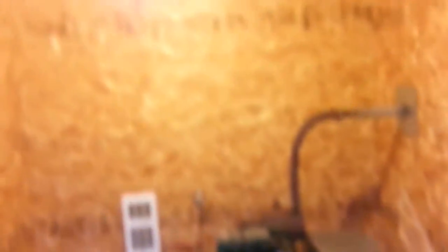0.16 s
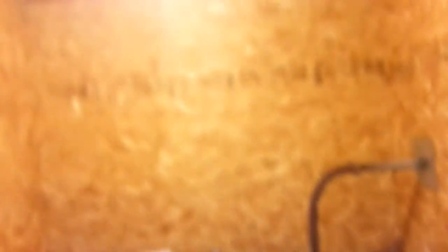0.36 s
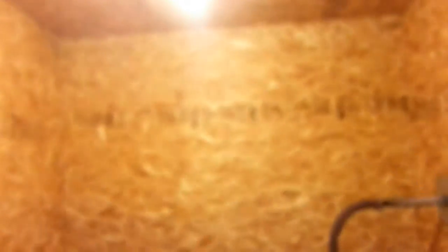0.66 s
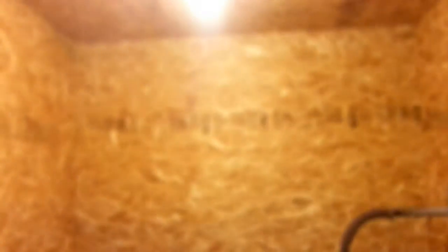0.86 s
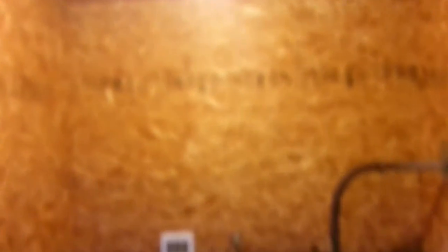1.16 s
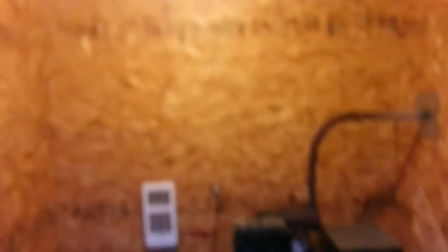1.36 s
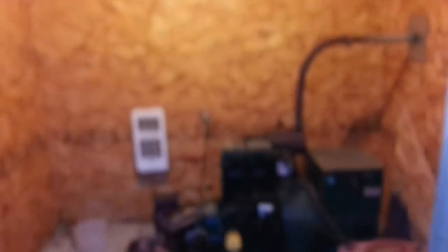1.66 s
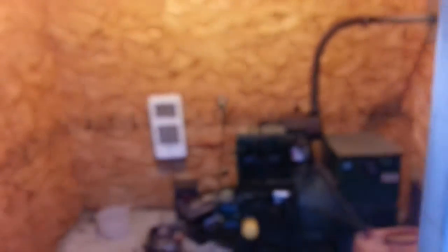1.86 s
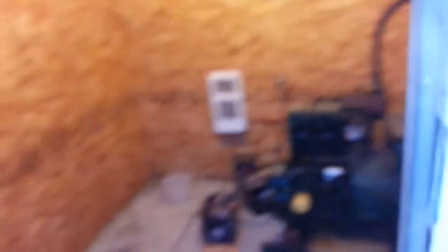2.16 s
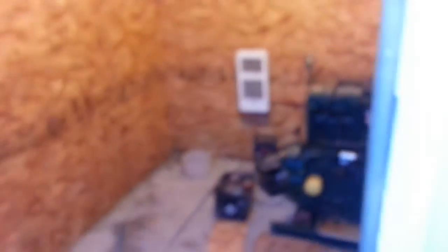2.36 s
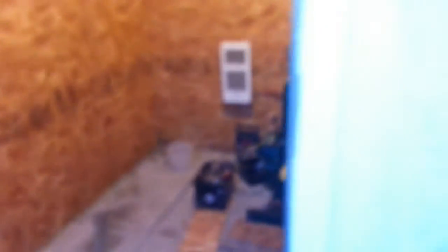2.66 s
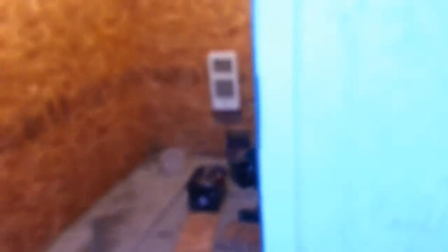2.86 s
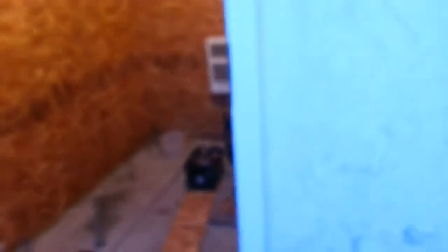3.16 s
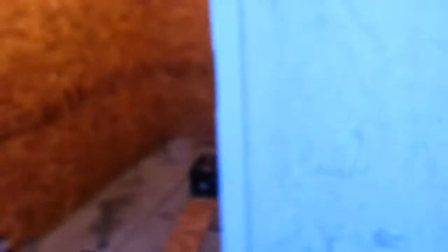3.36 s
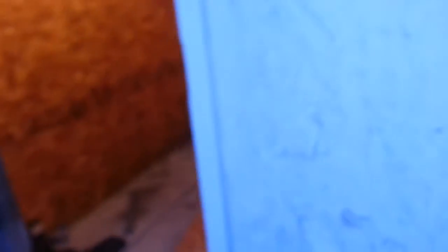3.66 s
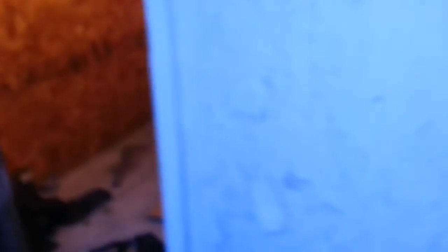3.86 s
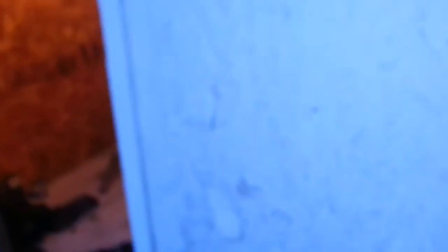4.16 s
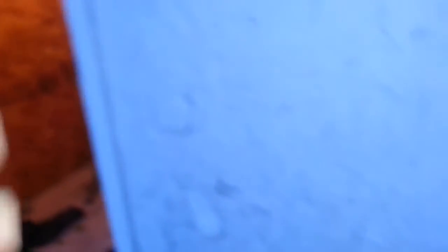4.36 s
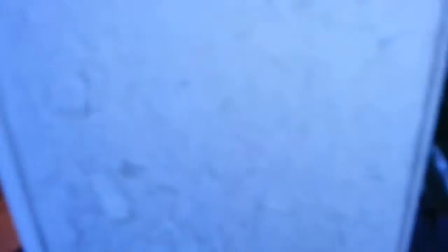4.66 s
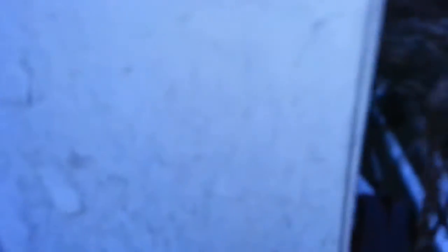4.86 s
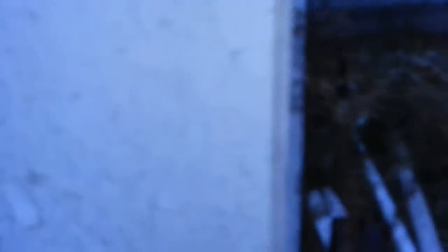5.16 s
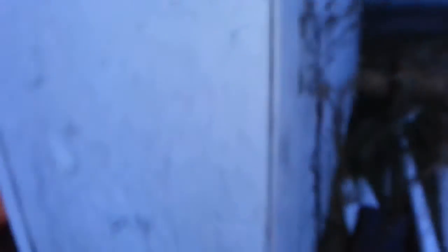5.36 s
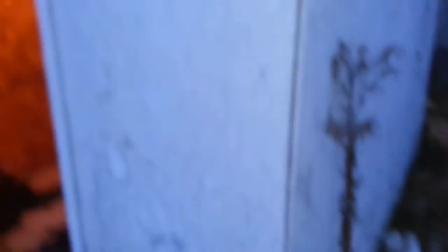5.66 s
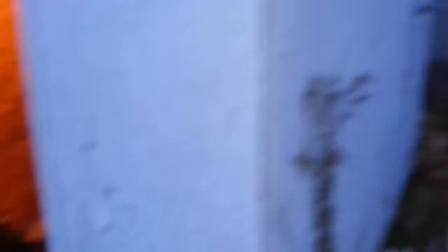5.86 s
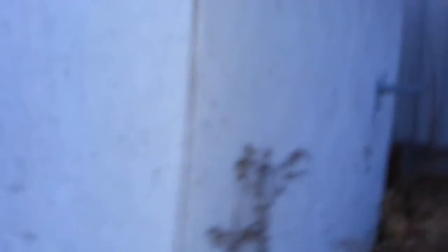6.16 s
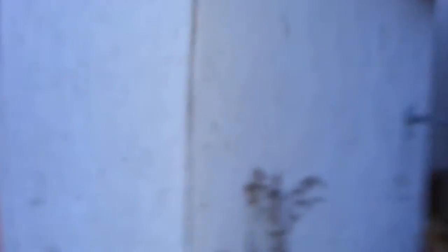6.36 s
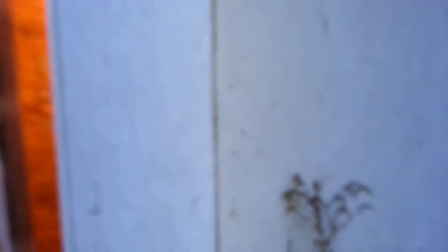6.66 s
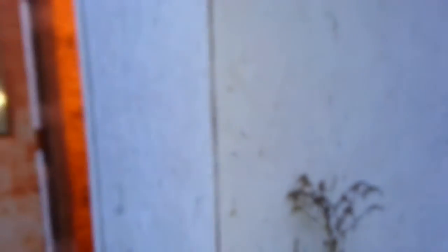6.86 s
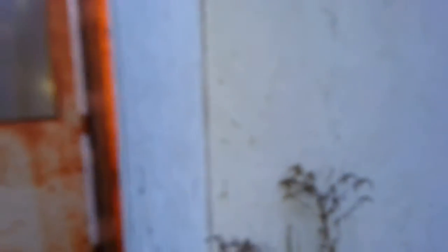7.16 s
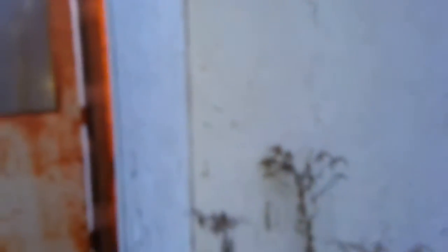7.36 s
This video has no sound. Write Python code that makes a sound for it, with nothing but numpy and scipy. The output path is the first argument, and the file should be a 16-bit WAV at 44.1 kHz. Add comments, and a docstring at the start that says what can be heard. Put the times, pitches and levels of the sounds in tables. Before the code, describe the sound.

A large diesel generator runs at a steady speed inside a small board shed. Its exhaust thumps in a fast, even, booming pulse over a low air rumble, with dense metallic knocking and ticking on top. After about two and a half seconds the microphone backs out through the door. The boom falls away and a ringing clatter comes forward, while the engine carries on unchanged to the end.

```python
"""A diesel generator booms and clatters at 1980 rpm, heard first from inside its small board shed.
Every engine cycle repeats the same blows: an exhaust thump booms in the shed over a low air rumble,
and combustion and valve knocks set off dense echoes that ring in the engine block and walls.
The higher the pitch, the less exactly it repeats. About 2.4 seconds in, the microphone backs out
through the door: the boom falls away and a ring near 2 kHz comes forward."""
import sys
import numpy as np
from scipy import signal
from scipy.fft import rfft, irfft
from scipy.io import wavfile
from scipy.ndimage import uniform_filter1d, map_coordinates

SR = 44100
rng = np.random.default_rng(int(sys.argv[2]) if len(sys.argv) > 2 else 0)


def transcribe(signal):
    """Save signal, clipped to [-1, 1], as a 16-bit WAV file at the path in sys.argv[1]."""
    frames = np.atleast_2d(signal).T
    limited = np.clip(frames, -1, 1)
    pcm = np.round(limited * 32767).astype(np.int16)
    wavfile.write(sys.argv[1], SR, pcm)


N = 331632
TIME, FREQ = np.arange(N) / SR, np.arange(N // 2 + 1) * SR / N + 1e-6
DOOR_S = 2.434  # when the microphone passes the door

# The blows of one engine cycle. Each row: place in the cycle from 0 to 1, pitch in Hz, spread in
# octaves, relative strength in dB, decay in seconds, direct sound in dB at the door, the same outside.
BLOW_PATTERN = [ (.034, 3900, .45, 4, 0.013, -10, -7), (.055, 7300, 0.22, 6, 0.0059, -10, -4.5),
                (.062, 1975, 0.092, 3.5, 0.0039, -12, 1), (.11, 2700, 0.28, -2, 0.011, -14, -10.5),
                (.17, 1203, 0.16, -12, .004, -2.5, -14), (.28, 1970, 0.11, 0.5, .012, -13, 0.5),
                (.28, 7000, 0.36, 1.5, .0064, -14, -8), (.333, 623, .3, 3, 0.0046, -9, -4.5),
                (.44, 1900, 0.098, -4, .003, -10, 0.5), (.49, 512, 0.29, 2, 0.0071, -4, -8),
                (.54, 12100, .16, 8.5, .019, -20, -20), (.595, 7250, .35, 3.5, 0.0045, -11, -8.5),
                (.712, 560, .3, -1, .006, -7, -5), (.76, 1970, 0.13, -3, 0.0027, -5.5, 0),
                (.79, 4520, 0.52, 3, 0.0089, -17, -12.5), (0.821, 670, 0.21, -9, .004, -1, -12),
                (.86, 2200, 0.92, -3, .004, -10.5, -10.5), (.94, 1300, 0.3, -1, 0.011, -7.5, -6.5),
                (.99, 1944, 0.088, 1, .003, -12, 3.5), ]


def undb(db):
    """Turn decibels into a gain."""
    return 10 ** (np.asarray(db) / 20)


def spectrum(table, column=1):
    """Read a table's dB column at every frequency."""
    columns = np.transpose(table)
    return np.interp(np.log(FREQ), np.log(columns[0]), columns[column])


def pitch_band(hz, octaves):
    """A gain that is 1 at one pitch and fades to either side."""
    return np.exp(-(np.log2(FREQ / hz) / octaves) ** 2)


def colour(x, gain):
    """Filter a sound with one gain for each frequency."""
    return irfft(rfft(x) * gain, N)


def wander(rate_hz):
    """A smooth random drift, mostly between -1 and 1."""
    hold = int(SR / rate_hz)
    steps = np.repeat(rng.standard_normal(N // hold + 1), hold)
    return uniform_filter1d(uniform_filter1d(steps, hold), hold)[:N]


def passing(at_s, ease_s):
    """A smooth step from 0 to 1 as the microphone passes a place."""
    return (1 + np.tanh((TIME - at_s) / (2 * ease_s))) / 2


def swell(at_s, half_s):
    """A smooth rise to 1 and fall around a moment."""
    return np.exp(-((TIME - at_s) / half_s) ** 2)


def air_rumble(outside, inside_db=3.5, side_db=-11):
    """Swirling air rumbles, stronger inside the shed and nearly the same left and right."""
    # The rumble outside. Each row: pitch in Hz, level in dB per Hz.
    rumble_levels = [(12, -76), (35, -72), (60, -63), (110, -65.5), (220, -60), (350, -63), (480, -66),
                     (900, -62.5), (1500, -84)]
    middle, side = rng.standard_normal((2, N))
    noise = middle + undb(side_db) * side * np.array([[1], [-1]])
    return colour(noise, np.sqrt(SR / 2) * undb(spectrum(rumble_levels))) * undb(inside_db * (1 - outside))


def exhaust_boom(cycle, outside, thump_place=.63, waver_db=1.2, lateness=.3, right_radians=.39):
    """The lowest exhaust tones join in one thump a cycle; higher ones come late off the walls."""
    # The boom's tones. Each row: multiple of the cycle rate, level in dB inside, level in dB outside.
    tones = [(3, -41, -45.5), (4, -33.5, -37), (5, -39, -37), (6, -47, -47.5), (7, -33.5, -45),
             (8, -33.5, -42.5), (9, -38, -40.5), (10, -29.5, -39), (11, -38.5, -45.5), (12, -39, -49.5),
             (13, -37, -65), (14, -32, -44.5), (15, -57, -61), (16, -27.5, -36), (17, -25, -44.5),
             (18, -61, -39.5), (19, -31.5, -55), (20, -39, -46.5), (21, -36, -62), (22, -42, -38.5),
             (23, -41, -45.5), (24, -38, -60)]
    out = np.zeros((2, N))
    for multiple, in_db, out_db in tones:
        above = max(multiple - 5, 0)
        scatter = min(above / 2, 1) * rng.standard_normal() - lateness * above ** 2
        angle = 2 * np.pi * multiple * (cycle - thump_place) + scatter + .08 * multiple * wander(2.96)
        level = np.sqrt(2) * undb(in_db + outside * (out_db - in_db) + waver_db * wander(8.3))
        lean_db = np.clip(1.2 * np.log2(multiple / 8), -.9, .9)  # the deepest tones lean right
        out[0] += level * undb(lean_db) * np.cos(angle)
        out[1] += level * undb(-lean_db) * np.cos(angle + right_radians)
    return out


def standing_waves(x, inside, walk_m_s=.322, sound_m_s=343, width_hz=18):
    """Waves trapped between the walls swell and sink once for each half wavelength walked."""
    # The shed's standing waves. Each row: pitch in Hz, swing in dB, time of one loud spot in seconds,
    # share of the walk that runs along the wave.
    waves = [(270, 3, 2.55, 0.94), (510, 4, 2.25, 1), (690, 2.5, 2.35, 0.82), (947, 10, 0.14, 0.18),
             (1192, 8, 1.9, 0.11), (1354, 3, 0.45, 0.24)]
    out = x
    for hz, swing_db, loud_s, along in waves:
        band = colour(x, np.exp(-((FREQ - hz) / width_hz) ** 2))
        half_waves = along * walk_m_s * (TIME - loud_s) * 2 * hz / sound_m_s
        out = out + band * (undb(swing_db * inside * np.cos(2 * np.pi * half_waves)) - 1)
    return out


def door_spill(x, swing_db=1.2, reach_s=.38):
    """The middle pitches are shaded just short of the door and spill out just past it."""
    past = (TIME - DOOR_S) / reach_s
    middle = colour(x, pitch_band(hz=1340, octaves=.93))
    return x + middle * (undb(swing_db * past * np.exp((1 - past ** 2) / 2)) - 1)


def door_frame(x, thud_db=1.8, clank_db=2.5):
    """The clanks, then the thuds, grow heavier as the microphone enters the door frame."""
    thuds = colour(x, pitch_band(hz=380, octaves=.7))
    clanks = colour(x, pitch_band(hz=2100, octaves=.61))
    thud_gain = undb(thud_db * swell(2.43, half_s=.14))
    clank_gain = undb(clank_db * swell(2.27, half_s=.12))
    return x + thuds * (thud_gain - 1) + clanks * (clank_gain - 1)


def shed_rings(x, outside, away, sharp_hz=16, blurred_hz=70, low_edge_hz=365, tick_db=3):
    """Block and walls ring; the doorway brings out the 2 kHz ring, and further off the rings blur."""
    # The clatter's broad tone. Each row: pitch in Hz, level in dB per Hz inside, the same outside.
    clatter_levels = [(414, -62, -55.5), (662, -48.5, -52.5), (930, -55, -55), (1164, -51, -49),
                      (1444, -45.5, -44.5), (1795, -45.5, -43.5), (2032, -45.5, -42.5), (2080, -52.5, -45),
                      (3050, -55, -52), (4650, -59, -58), (5570, -58.5, -56), (7190, -63, -65.5),
                      (10020, -75, -74.5), (12800, -72, -73.5), (15000, -89, -88)]
    # Rings of block, covers and walls. Each row: pitch in Hz, lift in dB inside, lift in dB outside.
    rings = [(385, 0, 3), (495, 8, 9.5), (544, 11, 7.5), (675, 7, 9.5), (794, 7.5, 4), (980, 3, 8),
             (1048, 7, 4), (1120, 5, 11), (1157, 2, 8.5), (1184, 7, 0), (1233, 5, 1), (1304, 3, 4.5),
             (1351, 9, 4.5), (1440, 2, 3), (1486, 2, 2), (1542, 5, 4.5), (1598, 7, 5), (1680, 3, 4.5),
             (1750, 0, 3), (1845, 3, 3.5), (1903, 8, 12.5), (2028, 6, 9.5), (2130, 0, 4), (2296, 2, 4)]
    ring_hz, in_db, out_db = np.transpose(rings)
    sharp, blurred = (sharp_hz / width * np.exp(-((FREQ - ring_hz[:, None]) / width) ** 2)
                      for width in (sharp_hz, blurred_hz))
    low_cut = np.sqrt(SR / 2 / (1 + (low_edge_hz / FREQ) ** 20))
    open_db = spectrum(clatter_levels, column=2)
    ticking_db = tick_db * pitch_band(hz=4530, octaves=.43)  # brighter ticking further off
    within = colour(x, low_cut * undb(spectrum(clatter_levels) + in_db @ sharp))
    beyond = colour(x, low_cut * undb(open_db + out_db @ sharp))
    far = colour(x, low_cut * undb(open_db + ticking_db + out_db @ blurred))
    return within + outside * (beyond - within) + away * (far - beyond)


def sound_paths(hz, walked, drift_hz=13000, apart_hz=900, left_lag_s=.00006):
    """Each pitch reaches the microphone with its own phase, which drifts with the distance walked."""
    start = 2 * np.pi * rng.random(len(hz))
    # Short waves reach the two sides by unrelated paths; long ones reach the left a little late.
    sides = np.minimum(hz / apart_hz, 1.8) * rng.standard_normal((2, 1, len(hz))) / np.sqrt(2)
    sides[0] -= 2 * np.pi * hz * left_lag_s
    drift = walked * hz / drift_hz * rng.standard_normal(len(hz))
    return np.exp(1j * (start + sides + drift))


def treble_patches(hz, turns, depth_db=3.2, full_depth_hz=3600):
    """Narrow patches of the treble swell and sink for a while; the broad tone stays even."""
    patches = uniform_filter1d(rng.standard_normal((2, turns, len(hz))), size=9, axis=1, mode="wrap")
    patches = uniform_filter1d(patches, size=4, axis=2)
    strength = undb(depth_db * np.minimum((hz / full_depth_hz) ** 2, 1) * patches / patches.std())
    return strength / np.sqrt(uniform_filter1d(strength ** 2, size=35, axis=2))


def echo_wash(cycle, pace, at_door, in_open, loose_radians=.27, loose_hz=7500, size=4096, tones=900):
    """Direct knocks and dense echoes come back every cycle and shift as the microphone moves."""
    turns = int(cycle[-1]) + 2
    each_turn = lambda control: np.interp(np.arange(turns), cycle, control)[:, None]
    multiple = np.arange(tones)
    hz = np.maximum(multiple, 1) * cycle[-1] / TIME[-1]
    walked = np.cumsum(each_turn(pace), axis=0)
    # The direct sound of a blow arrives all at once; the echoes fill the gaps.
    place, blow_hz, octaves, _, _, door_db, open_db = np.transpose(BLOW_PATTERN)
    shapes = np.exp(-(np.log2(hz[:, None] / blow_hz) / octaves) ** 2 / 2)
    delays = np.exp(-2j * np.pi * multiple[:, None] * place)
    direct_gain = each_turn(at_door) * undb(door_db) + each_turn(in_open) * undb(open_db)
    direct = (sound_paths(blow_hz, walked) * direct_gain) @ (shapes * delays).T
    phase = np.angle(direct + sound_paths(hz, walked))
    # No two blows land quite alike, which matters most in the treble.
    phase += np.hypot(loose_radians, hz / loose_hz) * rng.standard_normal((2, turns, tones))
    waves = irfft(treble_patches(hz, turns) * np.exp(1j * phase) * (hz > 300), size)
    wash = np.array([map_coordinates(side.ravel(), [cycle * size], order=3) for side in waves])
    return wash / wash.std() * np.sqrt(2 * hz[-1] / SR)


def blow_forces(cycle, cycle_db=.64, blow_db=2.1):
    """Whole cycles fire harder or softer, and each blow also varies on its own."""
    chance = rng.standard_normal((int(cycle[-1]) + 3, len(BLOW_PATTERN) + 1))
    return undb(cycle_db * chance[:, :1] + blow_db * chance[:, 1:])


def engine_knocks(cycle, force, wash, bite, flutter_db=.88, rise_s=.00052, bands=15):
    """Each blow lifts its own pitches out of the wash and dies away; bite sets how far."""
    place, blow_hz, octaves, blow_db, decay_s, _, _ = np.transpose(BLOW_PATTERN)
    powers = []
    for k in range(len(BLOW_PATTERN)):
        turn, part = np.divmod(cycle - place[k] + 1, 1)
        age_s = part * TIME[-1] / cycle[-1]
        strength = undb(blow_db[k]) * force[turn.astype(int), k]
        powers.append(strength ** 2 * (1 - np.exp(-age_s / rise_s)) * np.exp(-age_s / decay_s[k]))
    band_hz = np.geomspace(500, 12500, bands)
    reach = np.exp(-(np.log2(band_hz[:, None] / blow_hz) / octaves) ** 2 / 2)
    out = 0
    for share, power in zip(np.eye(bands), reach @ np.array(powers)):
        band = colour(wash, np.interp(np.log(FREQ), np.log(band_hz), share))
        lift = (1 + bite * power) / (1 + bite * power.mean())
        out = out + band * np.sqrt(lift) * undb(flutter_db * wander(13))
    return out


def engine_clatter(cycle, clear):
    """Combustion and valve knocks echo in the shed and stand out most in the open door."""
    # Firings that can land harder. Each row: time in seconds, extra level in dB.
    hard_firings = [(7.028, 2), (7.154, 2.5), (7.47, 0)]
    # The microphone's right side has its own resonance and faces away from the engine.
    # Each row: pitch in Hz, right minus left in dB.
    right_side = [(420, -1.5), (800, -1.5), (1100, -3.5), (1500, -5), (2000, -7.5), (2800, -4), (4000, -3),
                  (5500, -1), (6200, 4.5), (6850, 14), (7550, 15.5), (8500, 9.5), (10000, 9), (14000, 4)]
    outside = passing(DOOR_S, ease_s=.19)
    away = passing(8, ease_s=.25)  # a move further off, only just starting at the end
    pace = .844 - .525 * outside + .151 * away  # the walk slows past the door
    bite = .79 - .31 * outside + .46 * swell(DOOR_S, half_s=.2) + .4 * away
    at_door = swell(1.97, half_s=.98) * (1 - clear)
    force = blow_forces(cycle)
    wash = shed_rings(echo_wash(cycle, pace, at_door, clear), outside, away)
    clatter = engine_knocks(cycle, force, wash, bite)
    clatter *= undb(sum(db * swell(at_s, half_s=.011) for at_s, db in hard_firings))
    clatter[1] = colour(clatter[1], undb(spectrum(right_side)))
    return clatter


def scene():
    """One crankshaft times the boom and the clatter while the microphone backs out of the shed."""
    # The governor holds the speed almost steady. Each row: time in seconds, four-stroke cycles a second.
    speeds = [(0, 16.503), (1.9, 16.531), (3.1, 16.494), (6.2, 16.526), (7.52, 16.568)]
    cycle = np.cumsum(np.interp(TIME, *np.transpose(speeds))) / SR
    clear = passing(2.62, ease_s=.045)  # the microphone clears the door frame
    # Backing away from the engine makes most of the boom's fall; the door frame makes the rest.
    boom_outside = .68 * passing(.99, ease_s=.42) + .32 * clear
    engine = door_spill(engine_clatter(cycle, clear)) + exhaust_boom(cycle, boom_outside)
    return door_frame(standing_waves(engine, inside=1 - clear) + air_rumble(boom_outside))


def record(dry, ceiling=.92, top_hz=14600):
    """Round off the tallest peaks and cut the highest treble."""
    rounded = dry / (1 + (dry / ceiling) ** 6) ** (1 / 6)
    return signal.sosfilt(signal.ellip(10, .2, 80, top_hz, fs=SR, output="sos"), rounded)


dry = scene()
out = record(dry)
transcribe(out)
```